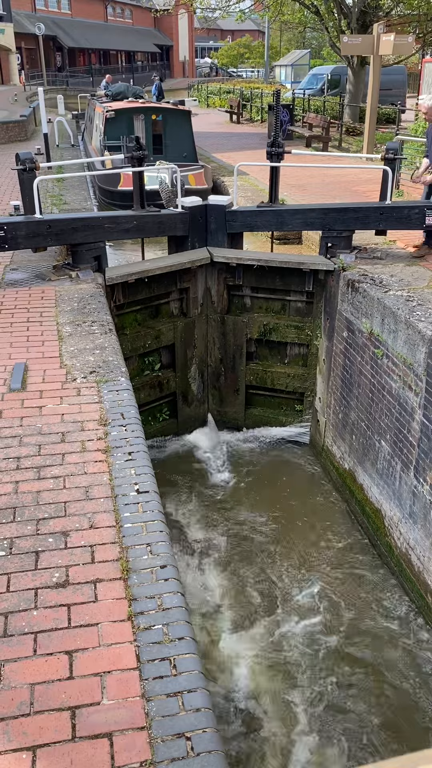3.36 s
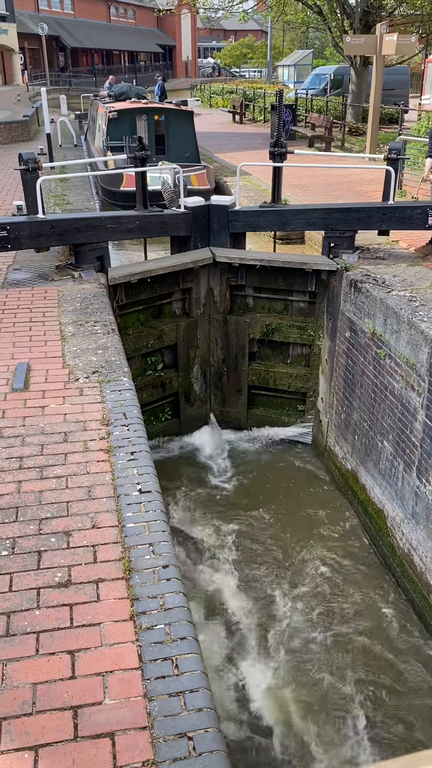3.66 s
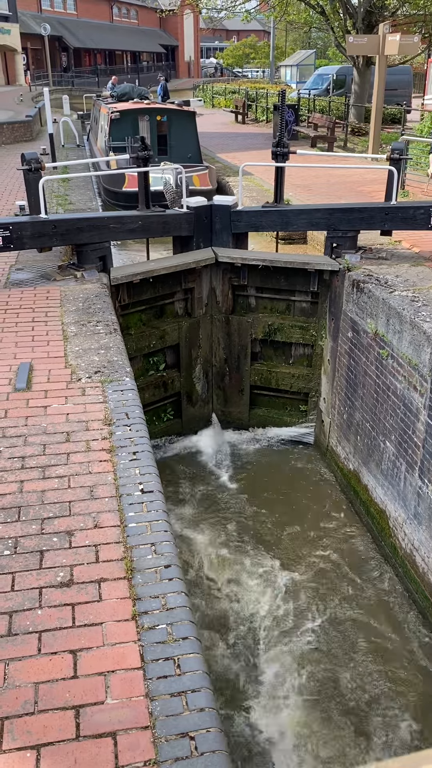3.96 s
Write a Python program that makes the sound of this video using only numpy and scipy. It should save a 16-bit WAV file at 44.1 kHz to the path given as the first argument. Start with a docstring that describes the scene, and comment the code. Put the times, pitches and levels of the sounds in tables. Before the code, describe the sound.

Foaming water wells up in an outdoor canal lock, close to the microphone, bubbling over a low rumble. A sluice ratchet gives several light metal clinks, then stops, as trapped air thuds and gurgles and the rush swells slightly.

```python
"""Lock chamber filling

Water wells up through a sluice into a brick lock chamber: a dense rush of foam and bubbles that slowly
grows, its crests toppling in splashes. Air pockets thump under the gates and break up in throaty gulps
over a rumble in the culvert. The steel pawl of the paddle gear clinks as the sluice is wound open.
Two close microphone ports hear it all."""
import sys
import numpy as np
from scipy import signal
from scipy.fft import rfft, irfft
from scipy.io import wavfile

SR = 44100
rng = np.random.default_rng(int(sys.argv[2]) if len(sys.argv) > 2 else 0)


def generate_wav(signal):
    """Clip the signal to [-1, 1] and save it as 16-bit WAV at the path in sys.argv[1]."""
    frames = np.transpose(np.atleast_2d(signal))
    scaled = np.clip(frames, -1, 1) * 32767
    pcm = np.round(scaled).astype(np.int16)
    wavfile.write(sys.argv[1], SR, pcm)


N = 176400


def undb(db):
    """Decibels to gain."""
    return 10 ** (np.asarray(db) / 20)


def unit(x):
    """Scale to rms 1."""
    return x / np.sqrt(np.mean(x ** 2))


def curve(rows):
    """An envelope of straight lines through (t/s, value) rows."""
    return np.interp(np.arange(N) / SR, *np.array(rows).T)


def swell(centre_s, sigma_s):
    """A bell-shaped envelope peaking at 1."""
    return np.exp(-((np.arange(N) / SR - centre_s) / sigma_s) ** 2 / 2)


def fade(t, t60):
    """Exponential decay, 60 dB down after t60 seconds."""
    return np.exp(-np.log(1000) * t / t60)


def freqs():
    """Frequency of each spectral bin, at least 1 Hz."""
    return np.maximum(np.arange(N // 2 + 1) * SR / N, 1)


def over_hz(rows):
    """Spread each value column of an (f/Hz, ...) table over the bins, along log frequency."""
    hz, *columns = np.array(rows).T
    return [np.interp(np.log(freqs()), np.log(hz), column) for column in columns]


def wander(rate_hz):
    """Smooth random modulation of rms 1, mostly slower than rate_hz."""
    return unit(irfft(rfft(rng.standard_normal(N)) / (1 + (freqs() / rate_hz) ** 2) ** 2, N))


def resonate(x, hz, width_hz):
    """A band-pass resonance applied twice."""
    f = freqs()
    return irfft(rfft(x) / (1 + 1j * (f / hz - hz / f) * hz / width_hz) ** 2, N)


def deep_noise(hz, width_hz, side_db):
    """Turbulence ringing one broad resonance, nearly alike left and right."""
    mid, side = (unit(resonate(rng.standard_normal(N), hz, width_hz)) for _ in range(2))
    return mid + undb(side_db) * side * np.array([[1], [-1]])


def add(out, start_s, sound):
    """Mix a sound into out from start_s on."""
    i = max(int(start_s * SR), 0)
    part = sound[..., :max(N - i, 0)]
    out[..., i:i + part.shape[-1]] += part


def echoes(x, t60):
    """Diffuse reflections from the brick walls, in mono."""
    tail = rng.standard_normal(SR // 2) * fade(np.arange(SR // 2) / SR, t60)
    return signal.fftconvolve(x, tail / np.sqrt(np.sum(tail ** 2)))[:len(x)]


def air_ring(hz, cycles, glide):
    """A pocket of air ringing down by 60 dB while its pitch moves by the fraction glide."""
    life_s = cycles / hz
    t = np.arange(int(life_s * SR) + 2) / SR
    return np.sin(2 * np.pi * hz * t * (1 + glide * t / life_s / 2)) * fade(t, life_s)


def rush(flow_db, foam_db):
    """Countless merged bubbles: half-octave bands surge together and flicker alone; two unrelated beds."""
    # tone of the rush at 0 dB inflow: f/Hz, level/dB per Hz
    spectrum = [(20, -76), (32, -57), (60, -57), (130, -56.5), (180, -58.5), (290, -54), (420, -59),
                (700, -58.1), (1200, -60.7), (1700, -64.4), (2500, -64.4), (2950, -71.8), (4300, -74),
                (5500, -71.3), (7200, -75.8), (9800, -76.5), (12000, -80.2), (15500, -82.6)]
    foam_above_hz, surge_depth_db, flicker_depth_db = 2400, 0.41, 0.82
    noise = rfft(rng.standard_normal((2, N))) * undb(over_hz(spectrum)[0]) * np.sqrt(SR / 2)
    surge_db = surge_depth_db * wander(rate_hz=14)
    octave, out = np.log2(freqs()), 0
    for centre in np.arange(4, 14.6, .5):  # octaves above 1 Hz
        band = irfft(noise * np.clip(1 - 2 * abs(octave - centre), 0, 1), N)
        ride_db = foam_db if 2 ** centre > foam_above_hz else flow_db
        flicker_db = flicker_depth_db * wander(rate_hz=25)
        out = out + band * undb(ride_db + surge_db + flicker_db)
    return out


def spray():
    """Foam cells bursting in tiny ticks, each a short puff of bright noise."""
    ticks_per_s, spread_db = 900, 5
    bursts = rng.random(N) < ticks_per_s / SR
    ticks = bursts * undb(spread_db * np.minimum(rng.exponential(size=N), 5))
    decay = fade(np.arange(SR // 10) / SR, t60=.012)
    power = signal.fftconvolve(ticks ** 2, decay ** 2)[:N]
    fizz = np.sqrt(abs(power)) * rng.standard_normal(N)
    return undb(-45.5) * unit(resonate(fizz, hz=6500, width_hz=13000))


def bubbles():
    """Single bubbles at the surface, rising in pitch and smeared by the chamber."""
    bubbles_per_s, low_hz, high_hz, spread_db = 280, 262, 2180, 3.4
    out = np.zeros(N)
    for when, pitch, strength in rng.random((int(bubbles_per_s * N / SR), 3)):
        hz = low_hz * (high_hz / low_hz) ** pitch
        db = -45 + spread_db * min(-np.log(1 - strength), 5)  # most are faint, a few pop out
        add(out, when * N / SR, undb(db) * air_ring(hz, cycles=26, glide=.12))
    return out + undb(-4) * echoes(out, t60=.32)


def rumble():
    """Turbulence booming in the culvert."""
    # swells of the rumble: t/s, level/dB
    levels = [(0, -29), (.15, -33.5), (.35, -29.5), (.7, -35), (1.0, -30), (1.3, -31), (1.58, -34.5),
              (2.0, -24), (2.4, -30), (2.9, -26), (3.3, -29), (4, -31.5)]
    return deep_noise(hz=63, width_hz=43, side_db=-13) * undb(curve(levels))


def pawl():
    """Short steel clinks, each slightly detuned and with its own echoes, reaching the left port first."""
    # the pawl falling on the ratchet: t/s, level/dB
    clinks = [(0, -25), (.262, -21), (.494, -32.5), (.977, -24), (1.249, -21.5), (1.476, -19.8),
              (1.836, -30), (2.382, -21)]
    # ringing modes of the steel: f/Hz, relative level/dB, t60/s
    modes = [(2600, -8.5, .12), (4700, -15, .06), (7130, -15, .07), (7450, 2.7, .125), (9720, -12, .1),
             (14860, -23, .2)]
    attack_s, right_lag_s = .0011, .000065
    t, out = np.arange(SR // 2) / SR, np.zeros(N)
    for start, db in clinks:
        detune = 1 + .002 * rng.standard_normal()
        ring = sum(undb(mode_db) * np.sin(2 * np.pi * hz * detune * t) * fade(t, t60)
                   for hz, mode_db, t60 in modes)
        ring *= 1 - np.exp(-t / attack_s)
        add(out, start, undb(db) * (ring + undb(-11) * echoes(ring, t60=.25)))
    delay = np.exp(-2j * np.pi * freqs() * np.array([[0], [right_lag_s]]))
    return irfft(rfft(out) * delay, N)


def thumps():
    """Big air pockets under the gates, each a soft-edged thud that sinks in pitch."""
    # air pockets: t/s, peak level/dB, starting f/Hz
    pockets = [(.285, -18.5, 62.5), (.385, -15, 105), (.455, -20, 76), (1.225, -25, 66), (1.265, -22, 78),
               (1.648, -14, 96), (1.735, -16, 76), (1.805, -26, 80), (1.935, -17, 70), (1.972, -14, 72),
               (2.012, -13.5, 108), (2.095, -15, 72), (2.135, -18, 76), (2.185, -16, 98),
               (2.298, -17.5, 95), (2.465, -17, 67.6), (2.59, -15, 70), (2.719, -13.5, 92),
               (2.805, -21, 72), (2.865, -19, 74.5), (2.94, -14.5, 104.5), (3.005, -12, 72),
               (3.055, -13, 80)]
    attack_s, out = .011, np.zeros(N)
    for start, db, hz in pockets:
        ring = air_ring(hz, cycles=6.8, glide=-.68)
        t = np.arange(len(ring)) / SR
        ring *= 1 - np.exp(-(t / attack_s) ** 2)
        add(out, start, undb(db) * ring / abs(ring).max())
    return out


def gulps():
    """Clouds of large, dull bubbles that swell and die away; the biggest rings briefly at the crest."""
    # air breaking the surface: centre t/s, swell sigma/s, level/dB before the low-pass, f/Hz
    clouds = [(.38, .09, -35, 280), (0.795, .012, -25.5, 310), (1.036, 0.023, -22.5, 285),
              (1.09, .018, -27.5, 290), (1.679, .025, -32, 140), (1.921, 0.019, -25, 189.6),
              (1.997, .042, -24.5, 160), (2.35, 0.21, -36, 232), (2.738, 0.016, -27, 177.6),
              (3.048, .02, -19, 200), (3.154, 0.12, -31, 235), (3.653, 0.35, -29.5, 280)]
    lowpass_hz = 436
    t, out = np.arange(N) / SR, 0
    for centre, sigma, db, hz in clouds:
        cloud = deep_noise(hz, width_hz=.94 * hz, side_db=-10.5) * swell(centre, sigma)
        biggest = np.sin(2 * np.pi * (hz * t + rng.random())) * swell(centre, sigma_s=.0077)
        out = out + undb(db) * (cloud + undb(-3) * biggest)
    return signal.sosfilt(signal.butter(4, lowpass_hz, fs=SR, output="sos"), out)


def splashes():
    """Crests of the boil toppling over: short swells of bright fizz."""
    # toppling crests: centre t/s, level/dB
    crests = [(.44, -36.5), (1.06, -36), (1.335, -37), (1.48, -37), (2.41, -35), (2.74, -35)]
    envelope = sum(undb(db) * swell(centre, sigma_s=.028) for centre, db in crests)
    return envelope * unit(resonate(rng.standard_normal(N), hz=2590, width_hz=6500))


def ports(direct, diffuse):
    """The water reaches the two ports with a lag, balance and stereo width that depend on pitch."""
    # stereo image: f/Hz, left lag/rad, left minus right level/dB, likeness of the sides (0-1)
    image = [(60, 0.5, 1, 1), (159, 0.75, -0.5, 0.8), (300, 0.25, 1, 0.91), (530, 0.66, -3.5, 0.85),
             (700, 0.5, -3, 0.94), (910, 1, -4.5, 0.87), (1220, 0.16, -3, .96), (1930, 0, -0.3, 1),
             (2410, -0.7, 0, 1), (3120, 0.15, -5, 0.7), (4350, -1.1, -3.5, 0.6), (4880, 0, -1, 1),
             (6050, -1.57, 1, 0.94), (6780, -3, -0.5, 1), (7960, -3, -0.5, 1), (8600, -4.5, 2.5, 0.6),
             (9900, -6.5, -1, .99), (11260, -6, -0.5, 0.9), (12660, -9, 0.5, .98), (14200, -9.5, 0, .98),
             (15300, -11, 0, 0.8)]
    lag, balance_db, likeness = over_hz(image)
    likeness, sign = np.clip(likeness, 0, 1), np.array([[1], [-1]])
    mid = rfft(direct) * np.sqrt((1 + likeness) / 2)
    side = rfft(diffuse) * np.sqrt((1 - likeness) / 2)
    panned = (mid + sign * side) * undb(sign * balance_db / 2)
    return irfft(panned * np.exp(-.5j * sign * lag), N)


def scene():
    """The churning surface rides the inflow, over the low end and the paddle gear at the gates."""
    # inflow through the sluice: t/s, relative level/dB
    inflow = [(0, -4.5), (.17, -3.5), (.35, -0.5), (.5, -0.9), (.63, -2.5), (.92, -3), (1.04, -1.3),
              (1.2, -2), (1.5, -.8), (1.72, -0.2), (1.87, -.4), (2.2, 0.25), (2.58, -.5), (2.95, 0.05),
              (3.15, 2), (3.43, 2), (3.62, 2.5), (4, 1.5)]
    flow_db = curve(inflow)
    foam_db = .74 * flow_db  # the hiss follows only part of the inflow's swing
    direct, diffuse = rush(flow_db, foam_db)
    gates = rumble() + thumps() + gulps() + pawl()
    surface = spray() * undb(foam_db) + bubbles() * undb(flow_db) + splashes()
    return ports(direct + surface, diffuse) + gates


def record(dry):
    """A steep low-pass takes off the very top."""
    top_hz = 15750
    return signal.sosfilt(signal.ellip(10, .2, 80, top_hz, fs=SR, output="sos"), dry)


dry = scene()
out = record(dry)
generate_wav(out)
```